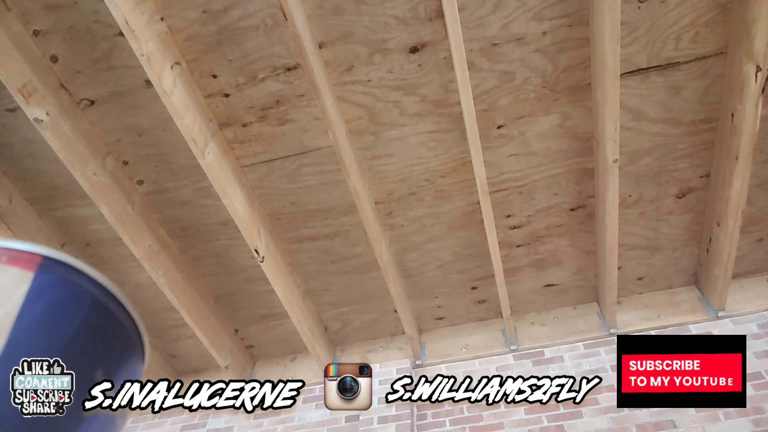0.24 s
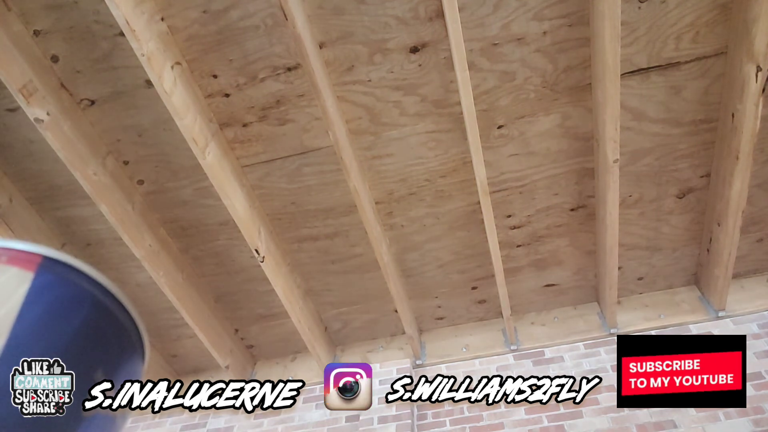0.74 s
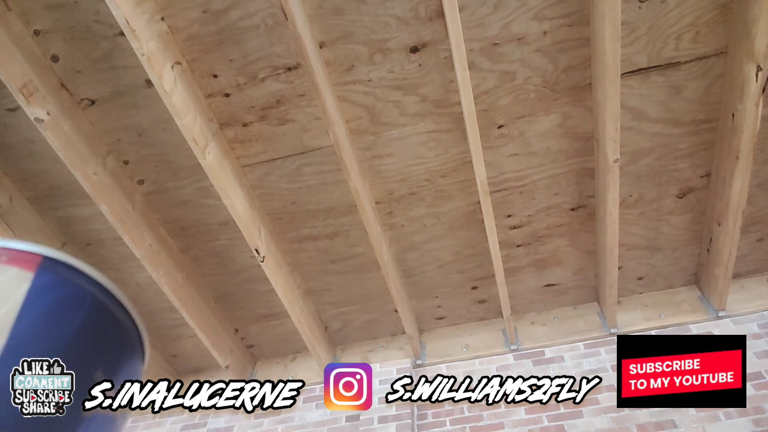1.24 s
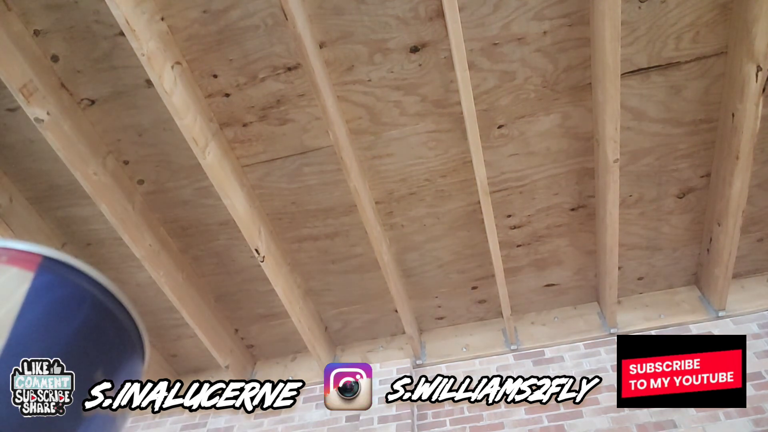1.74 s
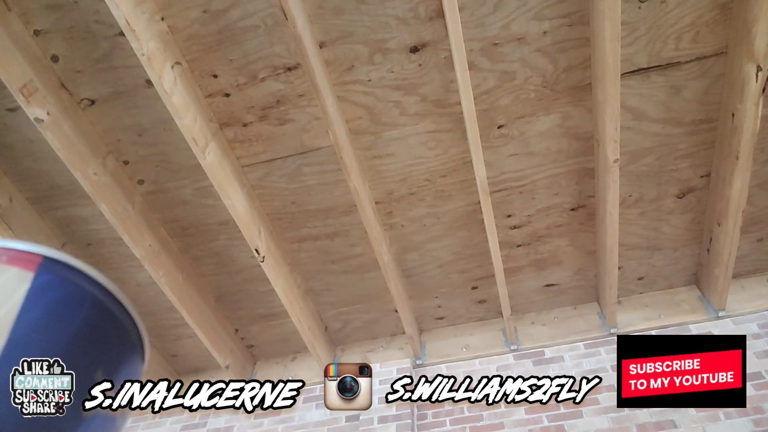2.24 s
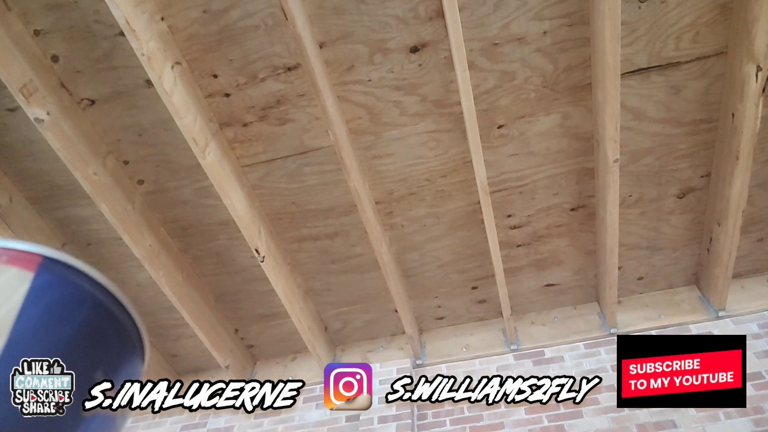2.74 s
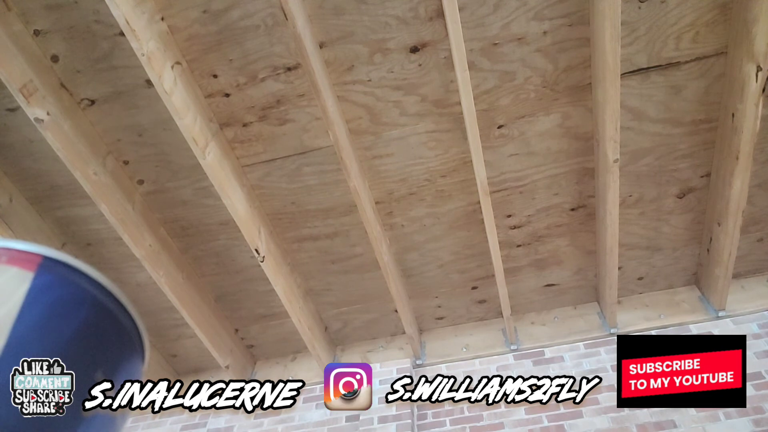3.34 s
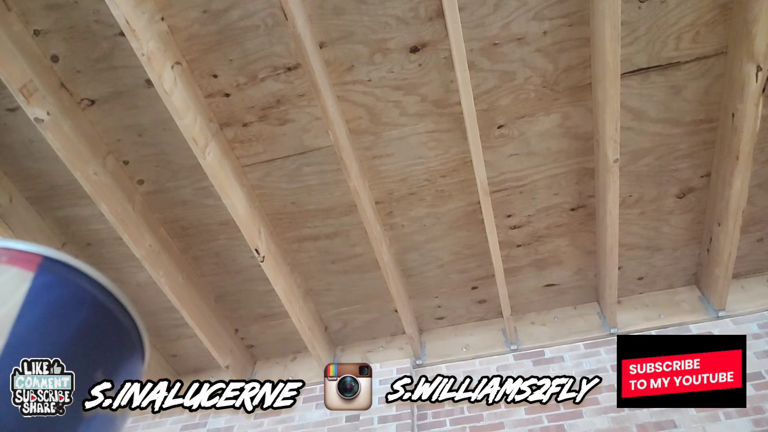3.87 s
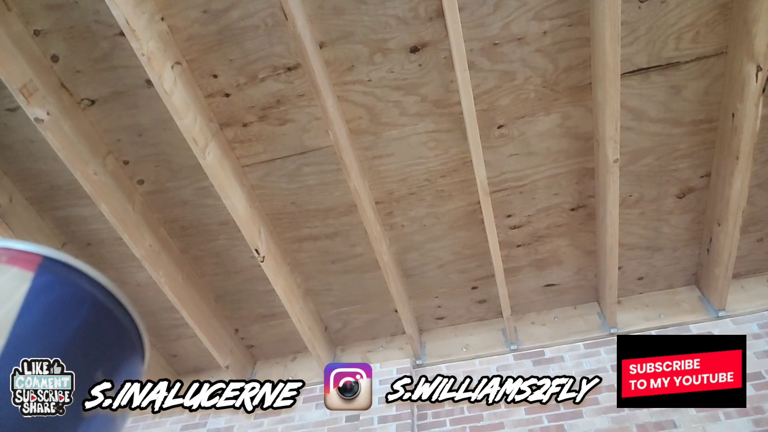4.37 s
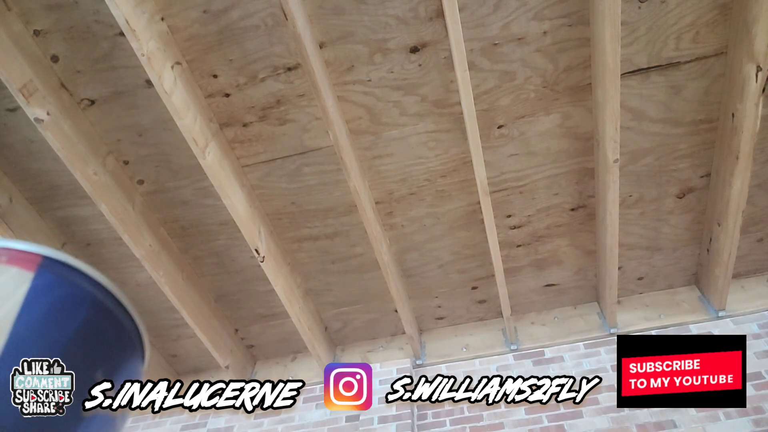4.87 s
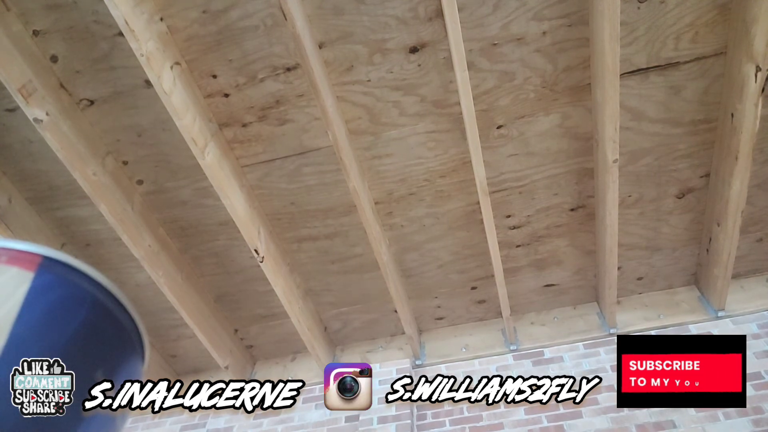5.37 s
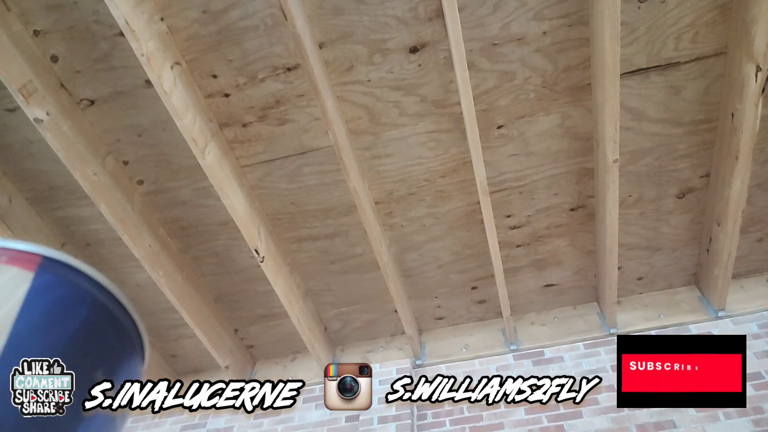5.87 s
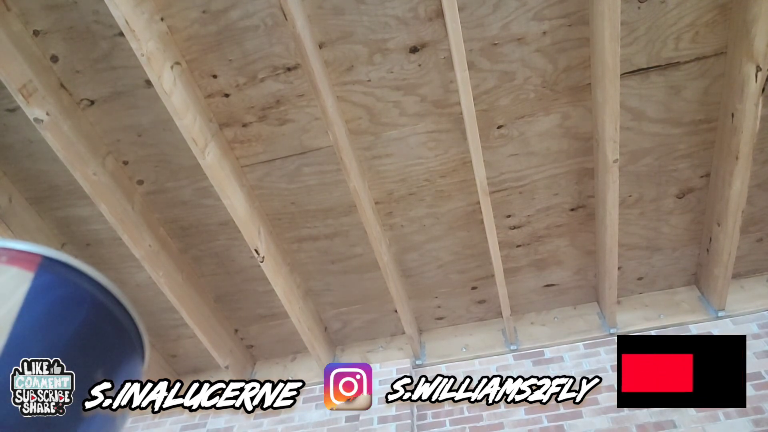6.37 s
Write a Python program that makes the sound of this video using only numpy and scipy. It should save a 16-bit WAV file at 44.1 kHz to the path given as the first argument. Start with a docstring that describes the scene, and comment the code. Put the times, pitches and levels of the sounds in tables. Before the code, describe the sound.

Light knocks and jingling keys, then a car door shuts with one heavy thump over a low hum in a garage.

```python
"""A garage with a low motor hum. Someone knocks about at a parked car and handles a bunch of keys,
which tick, jingle and give one sharp snap. Then a car door swings shut: seal, latch and panel
hit in quick succession, shove the air and set the body and the room booming.
Contacts are decaying bursts of coloured noise with an echo; ringing parts are damped sines."""
import sys
import numpy as np
from scipy import signal
from scipy.fft import rfft, irfft, next_fast_len
from scipy.io import wavfile
from scipy.ndimage import map_coordinates

SR = 44100
rng = np.random.default_rng(int(sys.argv[2]) if len(sys.argv) > 2 else 0)


def unload_audio(sound):
    """Save the sound as a 16-bit wav file, at the path given as the first command line argument."""
    columns = np.transpose(np.atleast_2d(sound))
    # keep every value between -1 and 1, then stretch to whole-number steps
    steps = np.round(np.clip(columns, -1, 1) * 32767)
    wavfile.write(sys.argv[1], SR, steps.astype(np.int16))


N = 291663
T = np.arange(SR) / SR  # the second after a blow
TOP_HZ = 15850

# Spectrum of a key click. Each row: frequency in Hz, relative level in dB.
CLICK_COLOUR = [(1000, -27), (3000, -16.5), (4500, -4), (6000, -2), (7200, 0), (8500, -9.5), (9600, -9.5),
                (11000, -9.5), (13000, -2.5), (15500, -5.5)]


def door():
    """Seal, latch and panel meet the frame one after another."""
    # Each row: start in seconds, relative level in dB, tilt in dB/octave, rise and t60 in seconds.
    contacts = [(5.141, -30.5, -3, 0.0031, 0.089), (5.152, -21.5, -2.5, 0.0056, 0.18),
                (5.166, -26.5, 0.5, 0.001, 0.15), (5.182, -25, 0, 0.004, 0.2),
                (5.207, -26, -0.5, 0.0027, 0.17)]
    # Each row: frequency in Hz, relative level in dB.
    colour = [(50, -20), (130, 1), (200, -5), (300, -4), (400, -9.5), (520, -7.5), (660, -8.5),
              (1150, -7.5), (1500, -13.5), (2100, -9.5), (3200, -16.5), (5500, -25), (8500, -41),
              (15000, -59)]
    # Each row: frequency in Hz, width in Hz, lift in dB.
    skin_resonances = [(178, 29, 7), (209, 27, 9), (520, 55, 9), (753, 32, 6.5), (923, 51, 3.5),
                       (1086, 25, 6.5), (1280, 17, -12), (1530, 37, 3), (1800, 26, 9), (2130, 23, 7),
                       (3210, 60, 4)]
    out = np.zeros((2, N))
    for s, db, tilt, rise_s, t60_s in contacts:
        add(out, s, amp(db + 8.5) * blow(colour, tilt, skin_resonances, rise_s, t60_s, room_db=-12.5))
    return out * pan(left_db=0.5)


def thuds():
    """A panel pushes one short wave of air and leaves the car body and the room booming."""
    # Each row: start in seconds, level in dB, pitch in Hz, swell in seconds, relative boom in dB.
    shoves = [(0.1223, -22.5, 86.4, .011, -17), (5.156, -16.5, 78.7, 0.026, -9),
              (5.1989, -5, 82, 0.0074, -25.5)]
    # Each row: frequency in Hz, relative level in dB, t60 in seconds.
    low_modes = [(42.8, -5.5, 1), (70.2, 5, 0.6), (111.1, 1, 0.48), (168.2, -24.5, 0.17),
                 (209.2, -1.5, 0.3), (310, 2.5, 0.4)]
    right_lag_s = 0.00096
    boom = sum(amp(db) * fade(t60_s) * np.sin(2 * np.pi * hz * T) for hz, db, t60_s in low_modes)
    out = np.zeros((2, N))
    for s, db, hz, swell_s, boom_db in shoves:
        push = (T / swell_s) ** 2 * np.exp(2 - 2 * T / swell_s) * np.sin(2 * np.pi * hz * T)
        wave = amp(db) * (push + amp(boom_db) * boom * onset(0.0013))
        add(out, s, np.array([wave, np.interp(T - right_lag_s, T, wave)]))
    return out


def knocks():
    """Bumps on panels and trim, some dull, some bright; loose parts and one heavy clunk ring on."""
    # Each row: start in seconds, level in dB, tilt in dB/octave, rise in seconds.
    bumps = [(.105, -36, -4.5, 0.0063), (.131, -30, -2, 0.0049), (.149, -31.5, -2.5, 0.0024),
             (.178, -38, 2, 0.0021), (.748, -38, 3, .014), (.788, -35, -3, .014), (1.685, -45, 10, 0.016),
             (2.168, -45, 7, .006), (2.343, -44, 8.5, 0.0038), (3.503, -33.5, 2, 0.0063),
             (3.528, -31.5, 1.5, 0.0068), (3.724, -43, 9.5, 0.0041), (3.788, -47.5, -1, .004),
             (4.514, -37, -4, .018), (4.958, -35, 3.5, 0.0091)]
    # Each row: frequency in Hz, relative level in dB.
    colour = [(50, -14), (190, -5.5), (450, -6.5), (700, -9), (1200, -11.5), (2500, -11), (3400, -16.5),
              (4000, -23.5), (5500, -25.5), (8500, -45), (15000, -49)]
    # Each row: frequency in Hz, width in Hz, lift in dB.
    trim_resonances = [(315, 22, -4), (477, 40, -0.5), (910, 85, 2.5), (1146, 24, 5), (1550, 49, 6),
                       (2730, 77, 2.5), (3350, 43, 10)]
    # Each row: frequency in Hz, level relative to the bump in dB, t60 in seconds.
    loose_parts = [(502, -12.5, 0.35), (3200, -22.5, 0.33)]
    # Each row: frequency in Hz, level in dB, t60 in seconds.
    clunk_modes = [(323, -35, 0.25), (526, -39, 0.2), (1137, -39.5, 0.27), (1207, -34, 0.27),
                   (2565, -27, 0.078), (3520, -53, .3)]
    out = np.zeros((2, N))
    for s, db, tilt, rise_s in bumps:
        bump = blow(colour, tilt, trim_resonances, rise_s, t60_s=0.17, room_db=-8.5)
        add(out, s, amp(db) * (bump + ringing(loose_parts)))
    add(out, s=0.134, sound=ringing(clunk_modes))
    return out * pan(left_db=0.3)


def snap():
    """One hard metal contact: a crack and a short ring."""
    # Each row: frequency in Hz, level in dB, t60 in seconds.
    modes = [(2200, -36.5, 0.27), (3360, -37, .22), (5265, -40, 0.32), (8130, -26, 0.073),
             (11710, -36, 0.246)]
    out = np.zeros((2, N))
    crack = blow(CLICK_COLOUR, 0, (), rise_s=0.00069, t60_s=0.023, room_db=-23.5)
    add(out, s=3.5138, sound=amp(-15.5) * crack + ringing(modes))
    return out * pan(left_db=2.5)


def key_ticks():
    """Keys brush, click and ring the bunch; now and then one swings free and clinks clearly."""
    # Each row: start in seconds, level in dB.
    ticks = [(.177, -53), (0.508, -61), (1.896, -51), (2.145, -37), (2.203, -38), (2.337, -33),
             (2.462, -41), (2.542, -40.5), (2.646, -61), (3.378, -51), (3.502, -27), (3.516, -21),
             (3.591, -35.5), (4.318, -41), (4.496, -50), (4.902, -36.5), (4.97, -49.5), (5.164, -28.5),
             (5.975, -38.5)]
    # Each row: start in seconds, pitch in Hz, level in dB.
    clinks = [(0.651, 7130, -54), (1.828, 7130, -59), (1.885, 5070, -55), (2.281, 7000, -45.5),
              (2.436, 11900, -44.5), (2.644, 14520, -48), (2.69, 11930, -42.5), (2.82, 11250, -51),
              (3.111, 7200, -53.5), (3.135, 5850, -56), (3.149, 13600, -46), (3.875, 7100, -54.5),
              (4.493, 7140, -51.5), (4.497, 15200, -45), (4.782, 13780, -56), (5.055, 13780, -50),
              (5.228, 13700, -50), (6.249, 12050, -57.5)]
    brush_lead_s, brush_db, ring_db = 0.012, -11, -11
    out = np.zeros((2, N))
    for s, db in ticks:
        for start_s, level_db in (s - brush_lead_s, db + brush_db), (s, db):
            click = blow(CLICK_COLOUR, 0, (), rise_s=0.0078, t60_s=0.078, room_db=-20)
            add(out, start_s, amp(level_db) * click)
        add(out, s, amp(db + ring_db) * bunch_ring(count=7))
    for s, hz, db in clinks:
        touch = noise(CLICK_COLOUR) * fade(0.029)
        add(out, s, amp(db - 8) * touch)
        add(out, s, amp(db) * (key_mode(hz) + amp(-7) * bunch_ring(count=4)))
    return out * pan(left_db=1.5)


def key_rattle():
    """The bunch shifts in the hand: a stream of tiny slips, with more jingle in a firm shake."""
    # Each row: frequency in Hz, relative level in dB.
    rub_colour = [(1500, -28.5), (4500, -11.5), (7000, -9), (8200, -16.5), (9500, -20), (11000, -10.5),
                  (12500, -5.5), (15500, -4.5)]
    slips_per_s, jingles_per_s, firm_db = 500, 75, -58
    motion = hand_motion()
    slips = (rng.random(N) < slips_per_s / SR) * rng.standard_normal(N)
    slip_sound = noise(rub_colour) * (fade(0.0041) + amp(-12.5) * fade(0.25))
    rasp = unit(signal.fftconvolve(slips[None], slip_sound, axes=1)[:, :N])
    jingle = np.zeros((2, N))
    for s in rng.uniform(0, N / SR, size=round(jingles_per_s * N / SR)):
        add(jingle, s, bunch_ring(count=2))
    firmness = np.clip(motion / amp(firm_db), 0, 1)
    hiss = amp(-1.5) * rasp + amp(-5.5) * noise(rub_colour, size=N)
    return motion * (hiss + amp(-1.5) * firmness * unit(jingle)) * pan(left_db=1.2)


def hand_motion():
    """Envelope of the rattle: shakes and faint random twitches swell, flutter and die away."""
    # Each row: start in seconds, length in seconds, level in dB.
    shakes = [(0.298, 0.034, -68.5), (1.68, .03, -70), (2.174, 0.53, -53), (2.856, 0.11, -57.5),
              (3.063, 0.15, -61.5), (3.4, .09, -62), (3.508, 0.17, -51), (3.75, .14, -64),
              (5.945, 0.22, -61)]
    rest_from_s, rest_to_s = 0.87, 1.64
    twitches_per_s, attack_s, release_db_per_s, flutter_db = 9, 0.015, 125.5, 1.5
    twitches = []
    for slot, (offset, weakness) in enumerate(rng.random((int(twitches_per_s * N / SR), 2))):
        s = (slot + offset) / twitches_per_s
        if not rest_from_s < s < rest_to_s:
            twitches.append((s, 0, -65 - 4 * weakness))
    attack = np.clip(T / attack_s, 0, 1)
    power = np.zeros((1, N))
    for s, length_s, db in shakes + twitches:
        release_db = release_db_per_s * np.maximum(T - length_s, 0)
        add(power, s, (attack * amp(db - release_db)) ** 2)
    return np.sqrt(power[0]) * amp(flutter_db * wobble(24.87))


def bunch_ring(count):
    """A contact stirs `count` random key modes unevenly, each off pitch: no two keys are cut alike."""
    # Each row: frequency in Hz, relative level in dB.
    key_modes = [(5890, -13), (6212, -7), (6930, -11.5), (7130, -2.5), (7520, -10), (8484, -5), (10750, -2),
                 (11251, -3.5), (11929, 4.5), (13130, 2), (13770, -5), (14520, -4), (15100, 1)]
    scatter_db, detune = 4.5, 0.013
    stirred = rng.permutation(np.array(key_modes))[:count]
    chance = rng.standard_normal((count, 2))
    return sum(amp(db + scatter_db * loud) * key_mode(hz * (1 + detune * off))
               for (hz, db), (loud, off) in zip(stirred, chance)) / np.sqrt(count)


def key_mode(hz):
    """One mode of a key, roughened by chatter against its neighbours."""
    size = SR // 6
    chatter = 0.045 * np.cumsum(rng.standard_normal((2, size)), -1)
    phase = 2 * np.pi * (hz * T[:size] + rng.random((2, 1))) + chatter
    return np.sin(phase) * fade(0.19)[:size] * onset(0.0013)[:size]


def blow(colour, tilt, peaks, rise_s, t60_s, room_db):
    """A contact stirs a dense crowd of damped modes, then the room."""
    direct = noise(colour, tilt, peaks) * fade(t60_s) * onset(rise_s)
    return direct + amp(room_db) * echo(noise(colour, tilt, peaks))


def ringing(modes):
    """Struck parts ring on, wavering a little and differently in each channel."""
    drift = 0.03 * np.cumsum(rng.standard_normal((len(modes), 2, SR)), -1)
    tones = sum(amp(db) * np.sin(2 * np.pi * hz * T + phase) * fade(t60_s)
                for (hz, db, t60_s), phase in zip(modes, drift))
    return tones * onset(0.012)


def echo(steady_noise):
    """The garage's tail: it builds up between the walls and each band dies at its own speed."""
    # Each row: frequency in Hz, t60 in seconds.
    decay_times = [(100, 0.7), (500, 0.61), (2500, 0.55), (6000, 0.55), (14000, 0.1)]
    hz, t, bands = signal.stft(steady_noise, SR, nperseg=256)
    decay = np.exp(-np.log(1000) * t / along(decay_times, hz)[:, None])
    tail = signal.istft(bands * decay, SR, nperseg=256)[1]
    return tail[:, :SR] * onset(0.0095)


def room_tone():
    """A motor hums unsteadily, swelling now and then, under a soft, even rush of air."""
    # Each row: frequency in Hz, level in dB, unsteadiness in dB.
    motor_tones = [(115.5, -50.5, 2.4), (79.4, -61, 3.7)]
    # Each row: peak time in seconds, lift in dB.
    swells = [(1.12, 7.5), (1.9, 7), (3.6, 7), (3.92, 10.5)]
    # Each row: frequency in Hz, relative level in dB.
    air_colour = [(20, -42), (35, -21), (64, -10.5), (112, -5.5), (147, -13.5), (310, -18.5), (457, -19.5),
                  (695, -24.5), (1010, -23.5), (1400, -27.5), (3280, -32.5), (7500, -48.5), (9000, -58.5),
                  (14000, -55)]
    swell_width_s = 0.085
    t = np.arange(N) / SR
    swell_db = sum(db * np.exp(-((t - s) / swell_width_s) ** 2) for s, db in swells)
    hum = sum(amp(db + unsteady_db * wobble(6)) * np.sin(2 * np.pi * hz * t + 0.33 * wobble(7.7))
              for hz, db, unsteady_db in motor_tones)
    air = amp(-49.5) * noise(air_colour, size=N) * pan(left_db=-0.4)
    return amp(swell_db) * hum + air


def noise(colour, tilt=0, peaks=(), size=SR):
    """Stereo noise of rms 1, tilted in dB/octave, lifted at its resonances, wide above the bass."""
    # Each row: frequency in Hz, left-right correlation.
    likeness = [(60, 0.89), (130, 0.76), (290, 0.97), (640, 0.2), (1400, 0.014), (7000, 0.023)]
    hz = np.fft.rfftfreq(size, 1 / SR)
    lift_db = sum(db / (1 + (2 * (hz - centre_hz) / width_hz) ** 2) for centre_hz, width_hz, db in peaks)
    tilt_db = tilt * np.log2(np.clip(hz, 200, 6000) / 1000)
    gain = amp(along(colour, hz) + lift_db + tilt_db) * (hz > 18) * (hz < TOP_HZ)
    angle = np.arccos(along(likeness, hz)) / 2
    white = rfft(rng.standard_normal((2, size)))
    mid, side = irfft(white * gain * [np.cos(angle), np.sin(angle)], size)
    return unit(np.array([mid + side, mid - side]))


def amp(db):
    """Decibels to gain."""
    return 10 ** (np.asarray(db) / 20)


def pan(left_db):
    """Stereo gains: left up and right down by left_db."""
    return amp([[left_db], [-left_db]])


def unit(x):
    """x at rms 1."""
    return x / np.sqrt(np.mean(x ** 2) + 1e-20)


def along(points, hz):
    """(Hz, value) points read on a log axis."""
    knots_hz, values = np.transpose(points)
    return np.interp(np.log(hz + 1), np.log(knots_hz + 1), values)


def onset(rise_s):
    """Rise towards 1 with time constant rise_s."""
    return 1 - np.exp(-T / rise_s)


def fade(t60_s):
    """Free decay by 60 dB in t60_s."""
    return np.exp(-np.log(1000) * T / t60_s)


def wobble(knots_per_s):
    """A smooth random curve."""
    knots = rng.standard_normal(int(N * knots_per_s / SR) + 4)
    return map_coordinates(knots, [np.arange(N) * knots_per_s / SR])


def add(track, s, sound):
    """Mix a sound into the track at s seconds."""
    start = round(s * SR)
    part = sound[..., :N - start]
    track[:, start:start + part.shape[-1]] += part


def scene():
    """Car, keys and background."""
    return door() + thuds() + knocks() + snap() + key_ticks() + key_rattle() + room_tone()


def record(dry):
    """The phone drops the deepest bass and keeps nothing above its band limit."""
    size = next_fast_len(N + SR)
    hz = np.fft.rfftfreq(size, 1 / SR)
    low_cut = hz ** 6 / (hz ** 6 + 30 ** 6)
    high_cut = 1 / (1 + (hz / TOP_HZ) ** 400)
    return irfft(rfft(dry, size) * low_cut * high_cut, size)[:, :N]


dry = scene()
out = record(dry)
unload_audio(out)
```